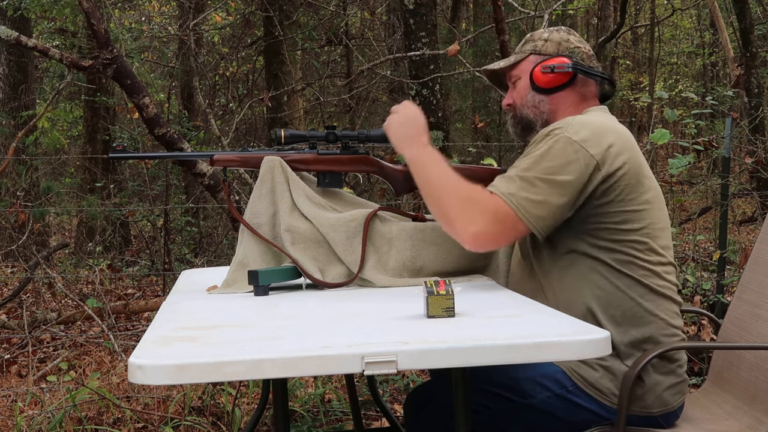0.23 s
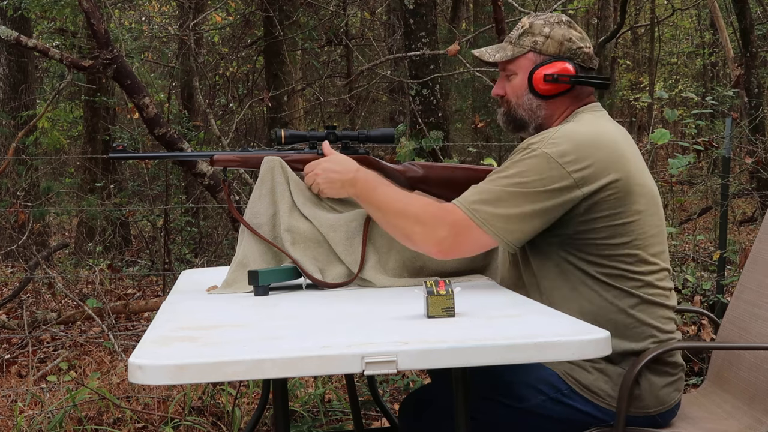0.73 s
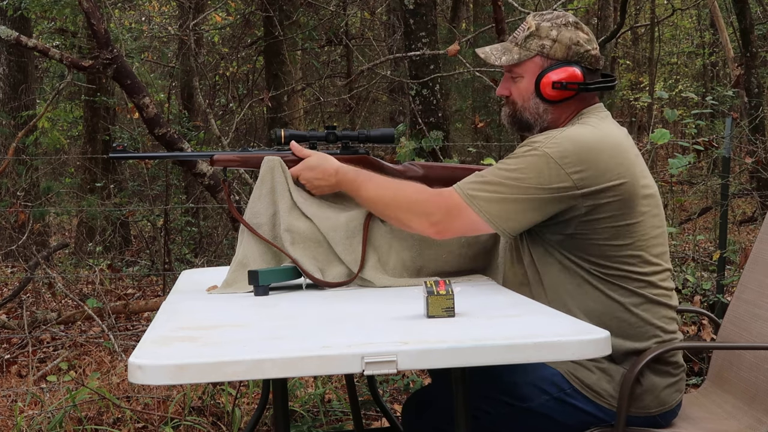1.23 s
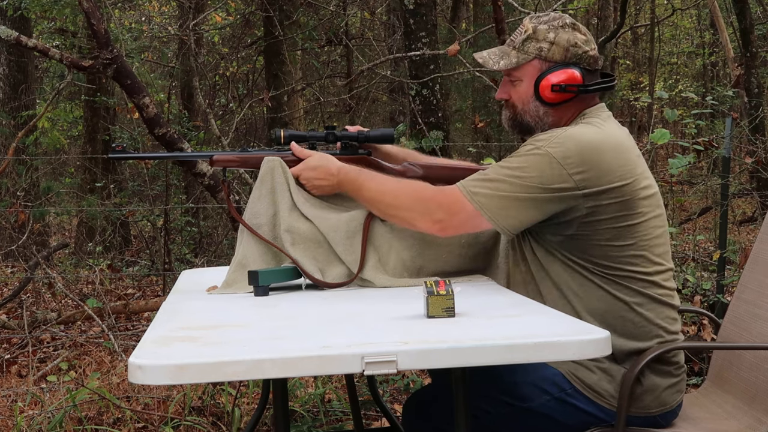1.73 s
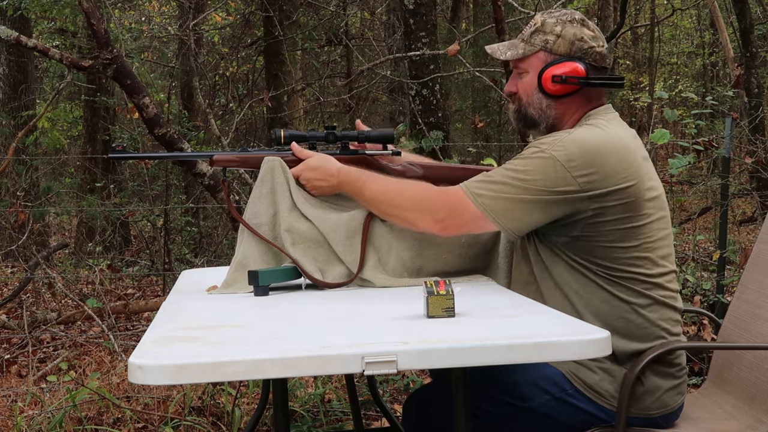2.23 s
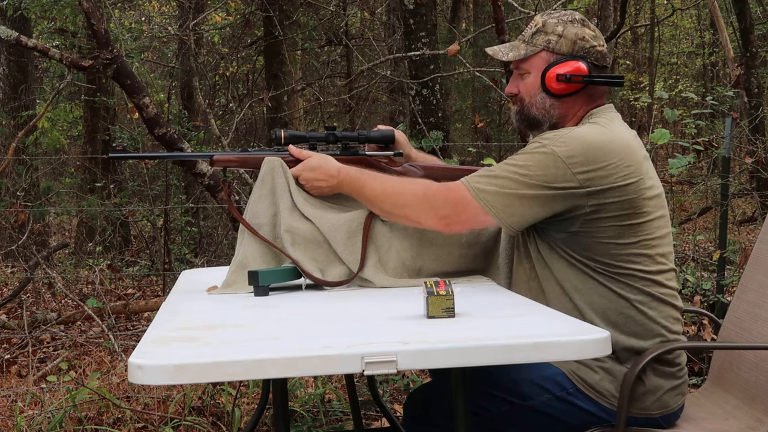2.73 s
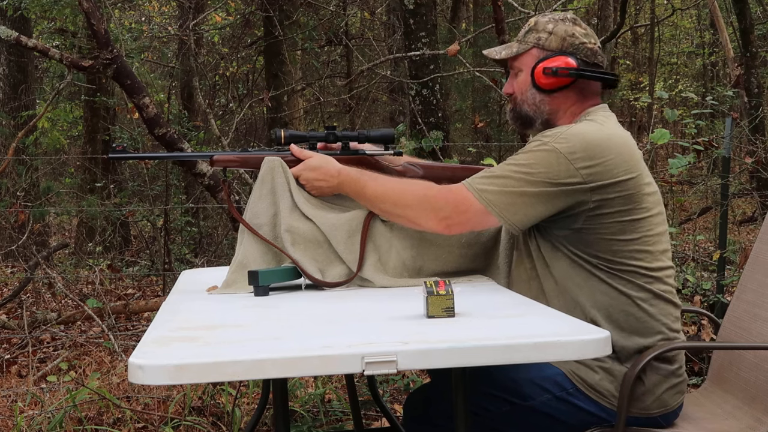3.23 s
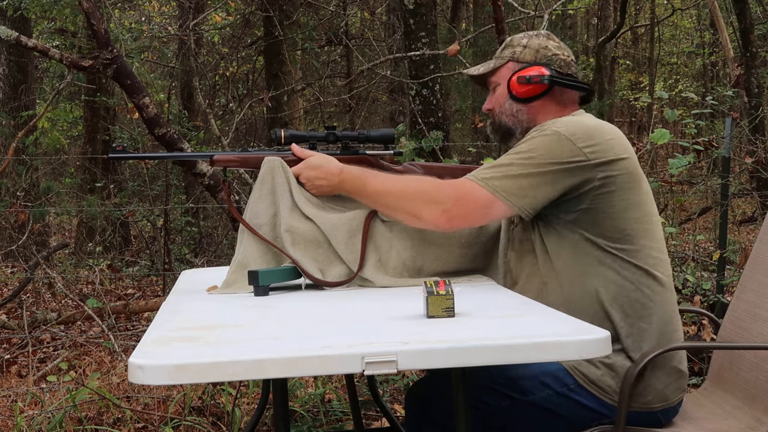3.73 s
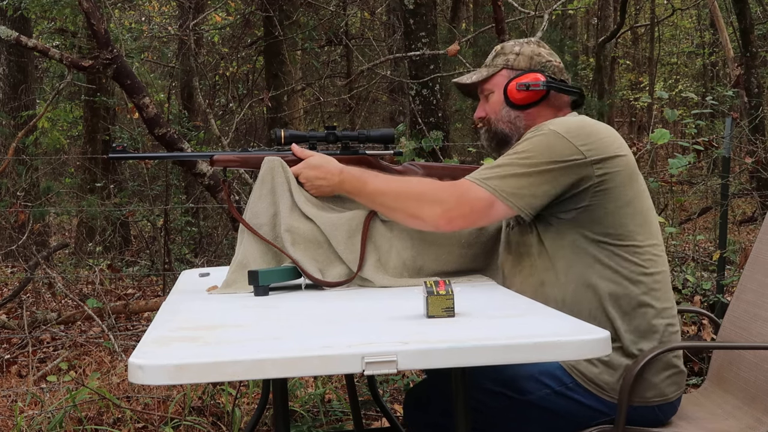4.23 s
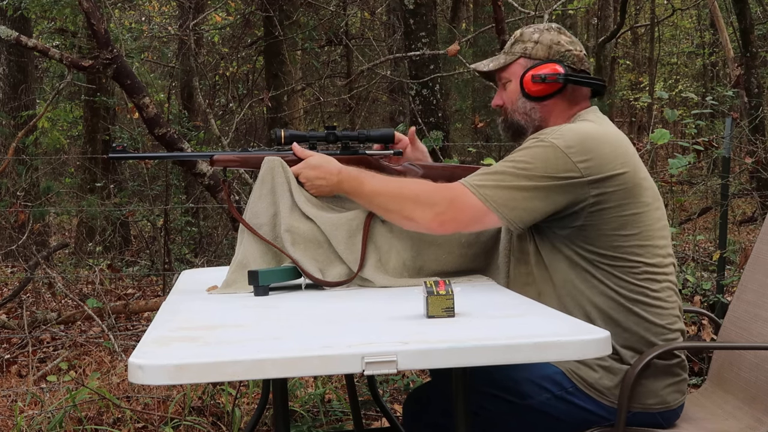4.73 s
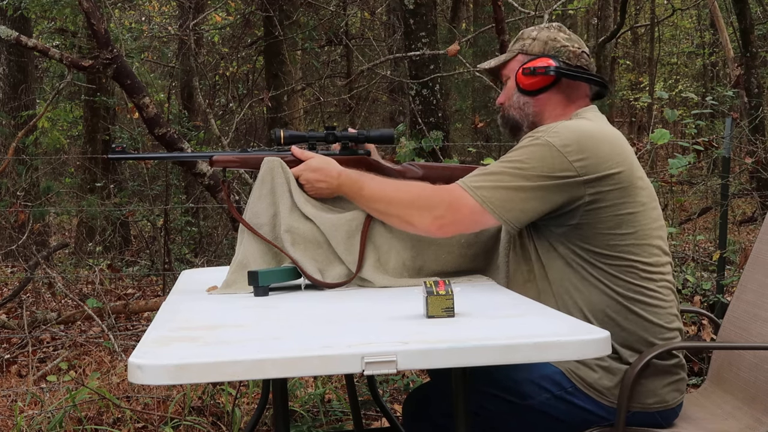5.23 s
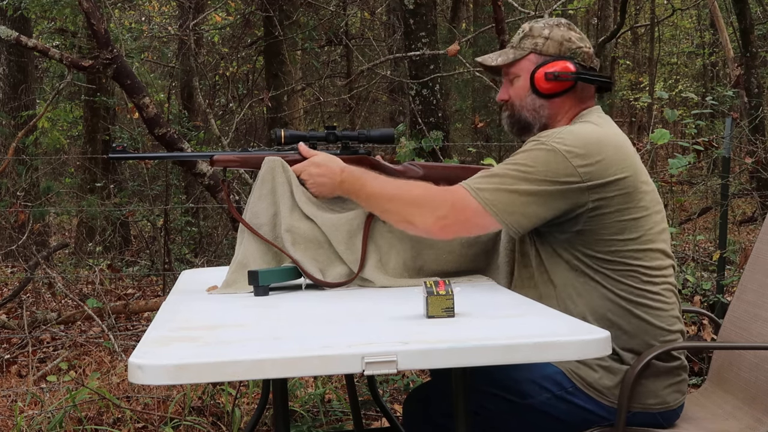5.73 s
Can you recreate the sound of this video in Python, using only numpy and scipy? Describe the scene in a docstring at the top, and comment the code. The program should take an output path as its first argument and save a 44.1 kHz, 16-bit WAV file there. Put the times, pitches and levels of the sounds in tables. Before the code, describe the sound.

A quiet wood with a low, steady leaf hiss and a close rifle on a cloth-covered rest on a plastic table. From 0.36 to 0.85 s a magazine is seated: a woody-metallic clunk, small rattles and a brief slide, then two firmer clacks near 0.67 and 0.74. A pause. From 1.4 to 2.5 s come light, uneven ticks, clicks and short gritty scrapes, with a faint high bird whistle just after 2.1. At 2.77 a crisp clack, then at 3.08 the loudest, a hard steel bolt knock with a slide, followed by clacks at 3.29 and 3.37 and a quick double near 3.45. From 3.6 to 4.9 only dull table bumps, soft rumble, faint brushing and a distant gliding whistle. At 5.09-5.26 a dense ratcheting metal cluster with a scrape, a sharp snap at 5.42, and small ticks to the end. Trees return a short, faint wash.

```python
"""In a quiet wood, a bolt-action rifle rests on a cloth-covered bag on a folding plastic table.
A magazine is seated, then the bolt is lifted, slid and locked in short clusters. Blows excite damped modes of
table top, stock and steel with noisy cracks; sliding is dense grit that rings the steel and hisses.
The table top rumbles as arms shift on it, leaves hiss as bands of noise, a far bird whistles as gliding sines,
and the trees return a dying wash."""
import sys
import numpy as np
from scipy import signal
from scipy.fft import rfft, irfft, next_fast_len
from scipy.io import wavfile

SR = 44100
rng = np.random.default_rng(int(sys.argv[2]) if len(sys.argv) > 2 else 0)


def inscribe(sig):
    """Save sig as 16-bit PCM at rate SR to the path in sys.argv[1].

    A 1-D sig is mono; a 2-D sig holds one channel per row.
    Samples are clipped to [-1, 1] before scaling.
    """
    pcm = np.round(np.clip(np.atleast_2d(sig).T, -1, 1) * 32767)
    wavfile.write(sys.argv[1], SR, pcm.astype(np.int16))


N = 264159

# Arms and bag shifting on the table: start_s [s], level_db [dB]
RUMBLE_LEVEL = [(0.0, -72), (0.4, -67), (0.62, -62), (0.97, -72), (1.92, -61), (2.08, -56.5), (2.52, -62.5),
                (3.0, -56.5), (3.15, -59), (3.28, -63.5), (3.52, -53.5), (3.62, -57), (4.0, -56),
                (4.17, -56), (4.28, -52), (4.45, -53.5), (4.74, -60.5), (4.99, -62), (5.34, -60),
                (5.49, -53.5), (5.76, -62.5), (5.99, -59.5)]
# Leaf hiss spectrum: pitch_hz [Hz], density_db [dB per Hz, relative]
LEAF_SPECTRUM = [(15, -48), (25, -18.5), (264, -5), (394, -1.5), (450, -4), (529, -3.5), (879, -4),
                 (2370, -8), (7890, -18.5), (11800, -22), (13100, -50), (15000, -61)]
# Breeze, as the level of the leaves: start_s [s], level_db [dB]
BREEZE_LEVEL = [(0.0, -58), (3.12, -56.5), (3.27, -53.5), (3.69, -57), (5.46, -57), (5.99, -58)]
# Left-right likeness of the leaves: pitch_hz [Hz], likeness [-1 to 1]
LEAF_LIKENESS = [(60, 0.88), (180, 1), (550, 0.88), (1650, 0.44), (4970, 0.024), (15000, -0.57)]
# Far bird, one table a phrase: start_s [s], pitch_hz [Hz], level_db [dB]
BIRD_PHRASES = [
    [(0, 7800, -71), (.2, 7800, -77)],
    [(2.13, 8900, -63), (2.25, 8500, -69.5), (2.5, 8300, -70), (2.75, 8300, -68)],
    [(4.17, 7500, -75), (4.3, 8200, -74), (4.48, 9040, -75), (4.7, 8340, -71), (4.97, 7900, -73)],
]
# Magazine against its well; the part levels are relative to the peak: start_s [s], peak_db [dB], table_db [dB],
# stock_db [dB], tick_db [dB], ring_hz (favoured) [Hz], chatter_s [s], any further_hz [Hz]
MAGAZINE_BLOWS = [(0.361, -18, -45, -10, -38, 2160, 0.009, 1335, 3000, 4054),
                  (0.371, -22.5, -36, -22, -41, 2160, 0.012), (0.384, -33, -37, 3, -32, 834, 0.006),
                  (0.396, -38, -32, -8, -27, 1320, 0.008), (0.411, -41, -22, 4.5, -28, 890, 0.008),
                  (0.423, -25, -33, -10, -36, 2960, 0.0049, 870, 2211),
                  (0.512, -37.5, -33, -4, -32, 874, 0.028), (0.536, -43, -28, 2, -40, 836, 0.0095),
                  (0.578, -55, -18, 13, -12, 860, 0.0042),
                  (0.605, -30, -32, -1.5, -37, 900, 0.0039, 3000, 2211),
                  (0.673, -13, -33.5, -13, -27, 1700, 0.0025, 6300, 3000),
                  (0.68, -26, -19, -20, -33, 2210, 0.004),
                  (0.738, -16.5, -54, -14.5, -48, 3150, 0.0025, 6500, 1700),
                  (0.762, -21, -30, -14, -18, 3100, 0.0044, 1707), (0.807, -40, -25, -6, -30, 1710, 0.004),
                  (0.847, -45, -21, -10, -27, 1710, 0.006)]
# Bolt, handle and cartridge contacts, and soft knocks of the rifle on its rest: start_s [s], peak_db [dB],
# table_db [dB], stock_db [dB], tick_db [dB], ring_hz [Hz], chatter_s [s], any further_hz [Hz]
BOLT_BLOWS = [(1.372, -46, -15, -2.5, -11, 1200, 0.0027), (1.417, -30, -35, -17.5, -2.5, 1544, 0.0019),
              (1.535, -36.5, -27, -9, -13, 3470, 0.0094), (1.594, -24, -39, -35, 2.5, 3060, 0.0015),
              (1.6, -21, -42, -16, 2, 3080, 0.003, 8500), (1.604, -14.5, -36, -6, -26, 849, 0.00092, 500),
              (1.648, -37, -6.5, -12, -17, 1770, 0.0022), (1.763, -32.5, -17, -13, -10.5, 1725, 0.0048),
              (1.793, -42, -25, 2, -30, 1030, 0.003), (1.854, -31.5, -38, -2.5, -27, 1050, 0.0028),
              (1.875, -31.5, -40, -8, -9, 1340, 0.003), (1.887, -31.5, -44, -4, -10, 1080, 0.003),
              (1.968, -27.5, -29, -7, -15.5, 1090, 0.0027), (2.001, -34.5, -24, -18, -22, 1390, 0.003),
              (2.022, -34.5, -25, -8, -3, 1220, 0.0023), (2.038, -18.5, -46, -22, -7, 3220, 0.0019),
              (2.05, -24, -27, -20, 2, 1520, 0.001), (2.138, -28, -20, -38, -14, 1840, 0.0034),
              (2.246, -42, -16, -26, -27, 1800, 0.0059), (2.447, -41, -14, -32, -26, 1920, 0.0066),
              (2.507, -41, -29, -6, -4, 1270, 0.0022), (2.674, -39, -27, -19, -5, 2920, 0.0076),
              (2.74, -31.5, -17, -7, -26, 1040, 0.003), (2.771, -30, -6.5, -2.5, 2, 4340, 0.0032),
              (2.776, -9, -48, -18, -8, 3000, 0.0015, 800, 1500, 5500),
              (3.077, 0.5, -19, -13, -18, 2000, 0.0012, 1450, 2700, 1200, 3600),
              (3.083, -11, -22, -4, -30, 1550, 0.006, 1200, 2300),
              (3.079, -21, -36, -30, 2, 5500, 0.003, 12500),
              (3.291, -9.5, -17, -16, -17.5, 3800, 0.003, 3300),
              (3.298, -17, -4, -8, -30, 1400, 0.003, 3650),
              (3.374, -18.5, -14, -6, -50, 3080, 0.003, 2010, 990),
              (3.398, -31, -30, -14, -40, 2000, 0.003, 3300),
              (3.444, -15, -20, -18.5, -15, 2120, 0.003, 1500, 3200),
              (3.449, -15, -22, -18.5, -19, 2120, 0.003, 1500, 4200),
              (3.453, -19, -22, -18, -25, 2120, 0.001), (3.481, -29.5, -6.5, -30, -31, 1520, 0.0043),
              (3.505, -29, -12, -10, -31, 1510, 0.0025), (3.674, -50, 16, -14, -30, 280, 0.012, 410),
              (3.897, -44, -2, -23, -22, 1650, 0.0048), (3.936, -41, -9.5, -23, -33, 1710, 0.016),
              (4.24, -52, 8.5, 3, -25, 394, 0.018), (4.39, -56, 10, -5, -25, 394, 0.012),
              (4.455, -56, 10, -5, -25, 394, 0.01), (4.6, -52, 6, -3, -25, 1900, 0.012, 270),
              (5.088, -31.5, -26, -15, 0, 1650, 0.0082), (5.125, -30, -30, -13, -8, 1850, 0.013),
              (5.14, -31, -32, -30, -12, 4400, 0.001), (5.163, -22, -39, -5, -5, 1090, 0.004),
              (5.168, -14, -49, -10, -8, 2600, 0.003, 4250), (5.173, -19, -45, -4, -15, 880, 0.005, 2650),
              (5.179, -18, -50, -8, -8, 3400, 0.003, 1090, 2650),
              (5.184, -16, -50, -7, -3, 3300, 0.002, 1090, 7000, 9300),
              (5.189, -17, -50, -10, -8, 2650, 0.003, 3300, 9300),
              (5.198, -21, -50, -12, -4, 3300, 0.006, 4300), (5.24, -31, -32, -32, 2.5, 6120, 0.002),
              (5.26, -16, -32, -1.5, -5.5, 1090, 0.003, 880, 1300),
              (5.322, -30.5, -21, -26, -20, 1640, 0.0032), (5.414, -35, -40, -30, 0, 6000, 0.002),
              (5.418, -9, -40, -10, -7, 2600, 0.0004, 1200, 3600, 9700),
              (5.431, -26, -7, -20, -12, 2920, 0.007), (5.505, -36, -18, -30, -5, 4000, 0.005),
              (5.513, -31.5, -4.5, -13, -30, 1750, 0.0041), (5.673, -35, -19, -12.5, -8, 1790, 0.004),
              (5.717, -40, -10, -10, -4.5, 2930, 0.0061), (5.828, -46.5, -2.5, -21, -27, 2100, 0.0031)]
# Sliding strokes of magazine and bolt, and light brushes of cloth: start_s [s], length_s [s],
# level_db (at the start) [dB], swell_db (by the end) [dB], treble_db (relative) [dB]
STROKES = [(0.489, 0.15, -56, 1.5, -29), (1.652, 0.025, -46, -15, -14), (1.75, 0.047, -48, -11, -17),
           (1.84, 0.13, -45, -25, -16), (1.99, 0.048, -63.5, 18, -7), (2.06, .05, -60, -16, 6),
           (2.749, 0.014, -45.5, 1.5, -5), (2.79, 0.084, -55, -22, 3.5), (3.102, 0.17, -46.5, -9.5, -34),
           (3.298, 0.063, -45.5, -19, 1), (3.364, 0.071, -46, -20, -38), (3.464, 0.09, -43, -19, -38),
           (4.585, 0.04, -58, -2, -25), (4.948, 0.045, -59, -5, -17), (5.011, 0.037, -48, -8, -25),
           (5.081, .07, -54, 8, -7.5), (5.15, 0.012, -50, 8, -20), (5.161, 0.074, -32, -27.5, -8),
           (5.277, 0.1, -53, -17, 0), (5.426, 0.04, -44, -23, 6), (5.496, 0.062, -43.5, -17, -9.5)]
# Damped modes of each body: pitch_hz [Hz], level_db [dB], t60_s [s]
TABLE_MODES = [(140, -22, .08), (200, -9, .07), (270, -2, .08), (325, -4, .07), (394, 0, .08),
               (443, -3, .07), (520, -9, .06)]
MAGAZINE_MODES = [(870, -4, .05), (955, -3, .08), (1220, -4, .08), (1335, -4, .06), (1562, -8, .06),
                  (1707, -2, .05), (2211, -6, .11), (2300, -5, .07), (2803, -6, .05), (3002, -2, .075),
                  (3143, -4, .085), (3646, -8, .07), (4054, -7, .08), (5100, -12, .04), (6200, -3, .04),
                  (6500, 0, .04), (8530, -8, .06)]
ACTION_MODES = [(679, -18, 0.06), (860, 0, 0.045), (965, -5.5, 0.07), (1090, 0.5, 0.04), (1180, -5, 0.05),
                (1310, -5, 0.06), (1545, -8, 0.03), (1790, -14, 0.028), (2120, -5, 0.028),
                (2405, 8, 0.0059), (2600, -4, 0.025), (2944, 6, 0.0098), (3334, 0, 0.012), (3650, 2, 0.016),
                (4186, 1.5, 0.012), (5090, 5, 0.0039), (6120, 2, 0.008), (9770, -12.5, 0.013),
                (12530, -16, 0.027)]
# Borders between table top, stock, steel and fine tick: edge_hz [Hz]
PART_EDGES_HZ = [150, 600, 1500, 4500, 16000]
# Stereo spread of the rifle and table: pitch_hz [Hz], side_db (each scatter path, against mid) [dB]
RIFLE_SPREAD = [(60, -25), (180, -25), (300, -30), (550, -21), (1000, -26), (1650, -32), (4970, -9),
                (15000, -2)]

RING = 6144  # samples a blow lasts
TABLE_RISE_S, TICK_RISE_S = 0.004, 0.0024  # the table top takes the blow through the bag and swells later
SWAY_HZ, SWAY_DB, SWAY_S = 70, -30, 0.015  # the folding legs give under a blow; level against the table top
BRIGHTER_DB = 3.5  # upward tilt, dB per octave, for each octave the favoured ring is higher
DULLER_PER_DB = 0.3132  # downward tilt, dB per octave, for each dB more in the table top
KNOCK_Q = 5.0  # sharpness of the short resonances that colour each crack
SPRAY_DB_PER_DOUBLING = 3.0  # spray grows by this when the chatter lasts twice as long
FURTHER_DB = -3.5  # further rings against the favoured one
BITE_S, LET_GO_S = 0.012, 0.01  # a stroke starts and stops within these
RATTLE_DB, RATTLE_S, RATTLE_TREBLE_DB = -19, 0.0056, -8  # against the contact's peak; treble also follows its tick
ECHO_DB, ECHO_T60_S, ECHO_CUT_HZ = -14.5, 0.4, 17000
ECHO_SPLIT_HZ, ECHO_TREBLE_T60_S = 5000, 0.28  # leaves soak up the treble sooner
BASS_CUT_HZ, CUTOFF_HZ = 35, 16450


def from_db(db):
    """Logarithmic level: 20 dB is a tenfold amplitude."""
    return 10 ** (np.asarray(db) / 20)


def rms_one(x):
    """Equal energy: scale to a root mean square of 1."""
    return x / np.sqrt(np.mean(x ** 2) + 1e-20)


def in_time(rows):
    """Linear interpolation of curve columns at every sample, -120 outside the rows."""
    s, *columns = np.transpose(rows)
    t = np.arange(N) / SR
    return [np.interp(t, s, column, left=-120, right=-120) for column in columns]


def at_hz(points, hz):
    """Linear interpolation of a spectrum along a log-frequency axis."""
    points = np.array(points)
    return np.interp(np.log(hz), np.log(points[:, 0]), points[:, 1])


def band(x, low_hz, high_hz):
    """Band-pass filtering between two edges."""
    return signal.sosfilt(signal.butter(2, [low_hz, high_hz], "band", fs=SR, output="sos"), x)


def drift(rate_hz):
    """Low-passed noise: slow chance with spread 1, computed every 40 samples."""
    pole = np.exp(-80 * np.pi * rate_hz / SR)
    white = rng.standard_normal(N // 40 + 2002)
    slow = signal.lfilter([1], [1, -2 * pole, pole * pole], white)[2000:]
    return np.interp(np.arange(N) / 40, np.arange(len(slow)), rms_one(slow))


def rumble():
    """Friction excites resonators: lumpy rubbing sets now one table mode going, now another."""
    rub = rng.standard_normal(N) * from_db(3.1 * drift(19.0))
    out = 0
    for hz, db, t60_s in TABLE_MODES:
        pole, angle = from_db(-60 / (t60_s * SR)), 2 * np.pi * hz / SR
        drive = rub * from_db(db + 1.6 * drift(3.0))
        out = out + signal.lfilter([0, np.sin(angle)], [1, -2 * pole * np.cos(angle), pole * pole], drive)
    return from_db(in_time(RUMBLE_LEVEL)[0]) * rms_one(band(out, 130, 2000))


def leaves():
    """Partial coherence: half-octave bands of stereo hiss, each with its own level and likeness."""
    out = 0
    edges_hz = 25 * 2 ** np.arange(0, 9.6, .5)
    white = rng.standard_normal((2, 2, N))
    for k, (low_hz, high_hz) in enumerate(zip(edges_hz, edges_hz[1:])):
        mid, side = band(white[k % 2], low_hz, high_hz)
        centre_hz = np.sqrt(low_hz * high_hz)
        alike = np.clip(at_hz(LEAF_LIKENESS, centre_hz), -1, 1)
        gain = from_db(at_hz(LEAF_SPECTRUM, centre_hz) + 1.29 * drift(1.75))
        out = out + gain * (np.sqrt(1 + alike) * mid + np.sqrt(1 - alike) * side * [[1], [-1]])
    steep = signal.cheby2(8, 40, 13600, fs=SR, output="sos")  # the hiss ends steeply here
    return from_db(in_time(BREEZE_LEVEL)[0]) * rms_one(signal.sosfilt(steep, out))


def bird():
    """Frequency modulation: a thin gliding whistle, blurred by the trees and out of phase left to right."""
    out = 0
    for rows in BIRD_PHRASES:
        hz, db = in_time(rows)
        phase = 2 * np.pi * np.cumsum(hz * (1 + .012 * drift(90))) / SR
        flutter_db = 3 * drift(25) + 2.7 * drift(5.0)
        out = out + from_db(db + flutter_db) * np.sin(phase + [[0], [2.2]])
    return out


def grains(count, per_s, spread_db):
    """Shot noise: random clicks of uneven size and sign."""
    sizes = from_db(spread_db * np.minimum(rng.exponential(1, count), 4))
    signs = rng.choice([-1, 1], count)
    return sizes * signs * (rng.random(count) < per_s / SR)


def sines(modes):
    """Damped free vibration: one exponentially dying sine a mode, as rows."""
    hz, db, t60_s = np.transpose(modes)[:, :, None]
    t = np.arange(RING) / SR
    return from_db(db - 60 * t / np.maximum(t60_s, .004)) * np.sin(2 * np.pi * hz * t)


def part_filters():
    """Band separation: each part's range, steep below."""
    filters = []
    for low_hz, high_hz in zip(PART_EDGES_HZ, PART_EDGES_HZ[1:]):
        in_range = signal.butter(2, [low_hz, high_hz], "band", fs=SR, output="sos")
        steep = signal.butter(4, low_hz * 0.95, "high", fs=SR, output="sos")
        filters.append(np.vstack([in_range, steep]))
    return filters


def blows(events, modes, crack_db, crack_s, spray_db, spray_s, favour_db, top_hz, lead_s, ring_db, tilt_db,
          knock_db, bite_s):
    """Impact excitation: a click and its dying chatter ring table top, stock and steel and crack briefly."""
    modes = TABLE_MODES + modes
    hz, rings, t = np.array(modes)[:, 0], sines(modes), np.arange(RING) / SR
    out, legs = np.zeros(N + RING), np.zeros(N + RING)
    part_of = np.searchsorted(PART_EDGES_HZ, hz) - 1  # a mode below the first edge belongs to no part
    f = np.maximum(np.fft.rfftfreq(2 * RING, 1 / SR), 1)
    octaves = np.log2(np.maximum(f, 1500) / 1500)
    # countless small modes: most die at once, some leave a spray
    quick, lasting = np.exp(-t / crack_s), from_db(spray_db) * np.exp(-t / spray_s)
    sway = from_db(SWAY_DB) * np.sin(2 * np.pi * SWAY_HZ * t) * np.exp(-t / SWAY_S)
    # the parts take a moment to bite
    table_rise, tick_rise = [1 - np.exp(-(t / rise_s) ** 2) for rise_s in (TABLE_RISE_S, TICK_RISE_S)]
    bite = 1 - np.exp(-t / bite_s)
    rises = [table_rise, bite, bite, tick_rise]
    filters = part_filters()

    for s, peak_db, table_db, stock_db, tick_db, ring_hz, chatter_s, *further_hz in events:
        chatter_s = max(chatter_s, 3e-4)
        push = grains(RING, per_s=1900, spread_db=5.0) * 0.31 * np.exp(-t / chatter_s)
        push[0] = 1  # the first contact
        felt = rfft(push, 2 * RING)
        start = round(s * SR)
        legs[start:start + RING] += from_db(peak_db + table_db) * sway
        slope_db = tilt_db + BRIGHTER_DB * np.log2(ring_hz / 1500) - DULLER_PER_DB * (table_db + 32)
        tilt = from_db(slope_db * octaves)

        # the place that is struck favours modes near its own pitches and knocks briefly on them
        near = np.array([ring_hz, *further_hz])[:, None]
        octaves_apart = np.log2(max(ring_hz, 1500) / np.maximum(near, 1500))
        even_db = FURTHER_DB * (near != ring_hz) + slope_db * octaves_apart  # evens out the tilt between rings
        resonances = from_db(even_db) / (1 + 1j * KNOCK_Q * (f / near - near / f))
        chatter = felt * (1 + from_db(knock_db) * resonances.sum(axis=0))
        closeness = np.exp(-(np.log2(hz / near) / 0.045) ** 2)
        strength = from_db(((favour_db + even_db) * closeness).max(axis=0))
        strength *= from_db(rng.normal(0, 0.4, len(hz))) * rng.choice([-1, 1], len(hz))

        spray = lasting * from_db(SPRAY_DB_PER_DOUBLING * np.log2(chatter_s / 0.003))
        crack = rng.standard_normal(RING) * (quick + spray)
        crack[40] += 6.5  # the faces meet in one sharp snap
        levels_db = [table_db, stock_db, -4, tick_db]
        for part, (part_db, share_db) in enumerate(zip(levels_db, crack_db)):
            rise = rises[part]
            body = strength[part_of == part] @ rings[part_of == part]
            if part == 0:  # the table top's modes feel every rebound, the others only the first contact
                body = irfft(felt * rfft(body, 2 * RING))[:RING]
            snap = signal.sosfilt(filters[part], crack)
            # every rebound cracks again
            cracks = rms_one(irfft(chatter * rfft(rise * snap, 2 * RING))[:RING])
            mixed = from_db(ring_db) * rms_one(rise * body) + from_db(share_db) * cracks
            sound = irfft(tilt * rfft(mixed, 2 * RING))[:RING]
            at = round((s - lead_s * (part == 3)) * SR)  # the tick part starts lead_s before the other parts
            out[at:at + RING] += from_db(peak_db + part_db) * sound / np.abs(sound).max()
    low_passed = signal.sosfilt(signal.butter(4, top_hz, fs=SR, output="sos"), out[:N])
    return band(low_passed, 150, 19000) + legs[:N]


def slides():
    """Sliding friction: uneven grit rings the steel and hisses; loose parts rattle on after bolt contacts."""
    grit = grains(N, per_s=6000, spread_db=3.5) * from_db(2.1 * drift(18))
    steel_response = rng.choice([-1, 1], len(ACTION_MODES)) @ sines(ACTION_MODES)
    steel = rms_one(signal.fftconvolve(grit, steel_response)[:N])
    scrape = rms_one(0.8 * rms_one(band(steel, 674, 4540)) + rms_one(band(grit, 657, 2480)))
    hiss = rms_one(band(band(grit, 1670, 11600), 1000, 16600))
    t, scrape_level, hiss_level = np.arange(N) / SR, 0, 0
    for s, length_s, db, swell_db, treble_db in STROKES:
        touch = np.clip(np.minimum((t - s) / BITE_S, 1 + (s + length_s - t) / LET_GO_S), 0, 1)
        level = touch * from_db(db + swell_db * np.clip((t - s) / length_s, 0, 1))
        scrape_level = scrape_level + level
        hiss_level = hiss_level + level * from_db(treble_db)
    jolts = np.zeros((2, N))
    for s, peak_db, table_db, stock_db, tick_db, *colour in BOLT_BLOWS:
        jolt_db = peak_db + RATTLE_DB
        jolts[:, round(s * SR)] = from_db([jolt_db, jolt_db + tick_db + RATTLE_TREBLE_DB])
    rattle = signal.lfilter([1], [1, -np.exp(-1 / (RATTLE_S * SR))], jolts + 1e-18)
    return (scrape_level + rattle[0]) * scrape + (hiss_level + rattle[1]) * hiss


def trees(x):
    """Diffuse scattering: trunks, ground and table return a dying wash, partly unlike left and right."""
    t = np.arange(SR // 2) / SR
    white = rng.standard_normal((2, 2, len(t)))
    lower = band(white[0], 220, ECHO_SPLIT_HZ) * from_db(-60 * t / ECHO_T60_S)
    treble = band(white[1], ECHO_SPLIT_HZ, ECHO_CUT_HZ) * from_db(-60 * t / ECHO_TREBLE_T60_S)
    wash = (lower + treble) * (1 - np.exp(-t / 0.0013))
    mid, side = signal.fftconvolve(x[None], wash / np.linalg.norm(wash[0]), axes=1)[:, :N]
    side = from_db(-4) * band(side, 3000, 15000)
    return from_db(ECHO_DB) * np.array([mid + side, mid - side])


def two_ports(x):
    """Near-field scatter: two ports agree in the bass; their treble differs, drifting slowly by chance."""
    size, side = next_fast_len(N + 2048), 0
    hz = np.maximum(np.fft.rfftfreq(size, 1 / SR), 1)
    tilted = rfft(x, size) * from_db(at_hz(RIFLE_SPREAD, hz))
    for path in range(3):
        smear = rng.standard_normal(2048) * np.exp(-np.arange(2048) / SR / 0.004)
        scattered = irfft(tilted * rfft(smear / np.linalg.norm(smear), size), size)[:N]
        side = side + np.tanh(drift(3.1)) * scattered
    return np.array([x + side, x - side])


def scene():
    """Superposition: rifle and table close by, the wood around."""
    magazine = blows(MAGAZINE_BLOWS, MAGAZINE_MODES, crack_db=[-13, -0.5, -2, 3], crack_s=0.0015,
                     spray_db=-14.5, spray_s=0.013, favour_db=10, top_hz=7500, lead_s=0,
                     ring_db=-1.5, tilt_db=-9.0, knock_db=6.5, bite_s=0.0005)
    bolt = blows(BOLT_BLOWS, ACTION_MODES, crack_db=[-10.0, -5, -2.0, 6.5], crack_s=0.00079,
                 spray_db=-19.5, spray_s=0.023, favour_db=11.0, top_hz=11900, lead_s=0.0022,
                 ring_db=-8.0, tilt_db=-5.0, knock_db=7.0, bite_s=0.0012)
    handling = slides() + bolt
    echo = trees(handling + from_db(-3) * magazine)  # the hand round the magazine keeps some of it from the trees
    return two_ports(magazine + handling + rumble()) + echo + leaves() + bird()


def record(dry):
    """Band limiting: a microphone's high-pass drops the deep bass, a steep low-pass cuts the top."""
    thin = signal.sosfilt(signal.butter(2, BASS_CUT_HZ, "high", fs=SR, output="sos"), dry)
    return signal.sosfilt(signal.cheby2(12, 70, CUTOFF_HZ, fs=SR, output="sos"), thin)


dry = scene()
out = record(dry)
inscribe(out)
```